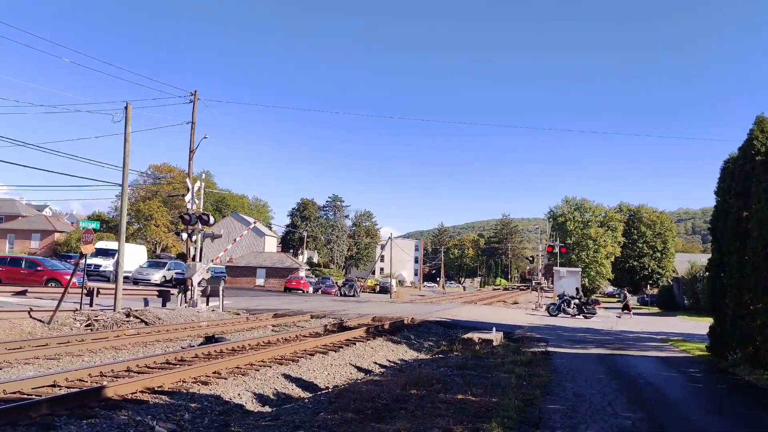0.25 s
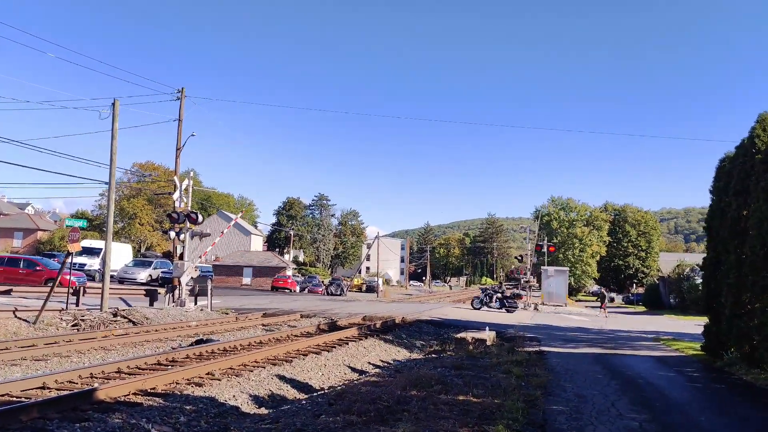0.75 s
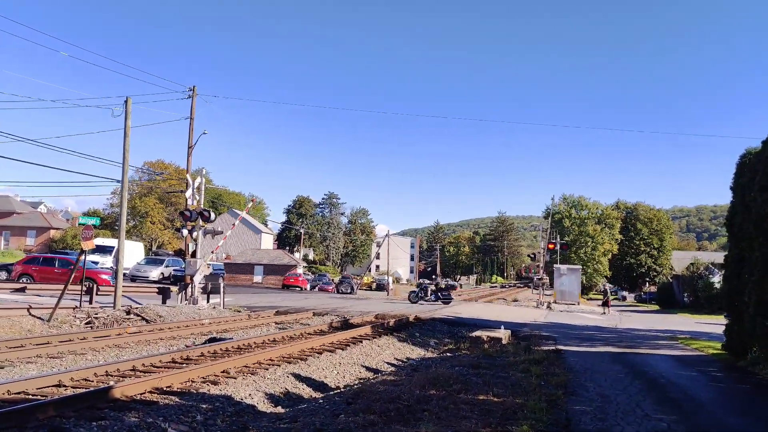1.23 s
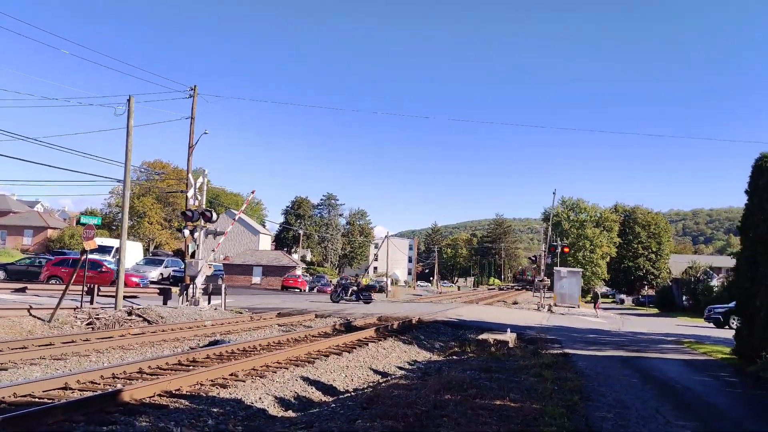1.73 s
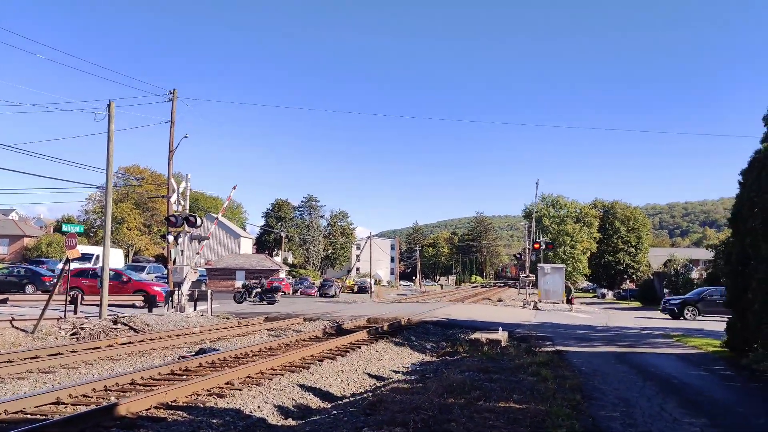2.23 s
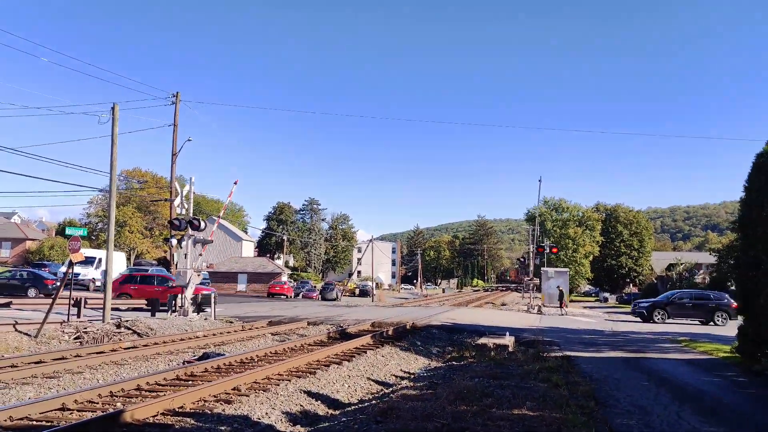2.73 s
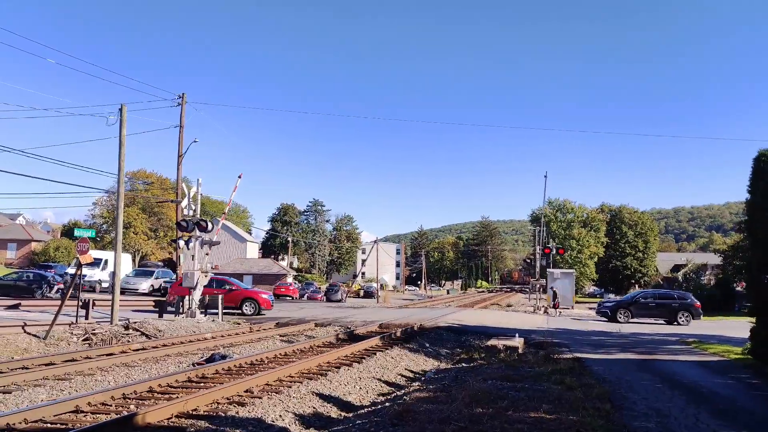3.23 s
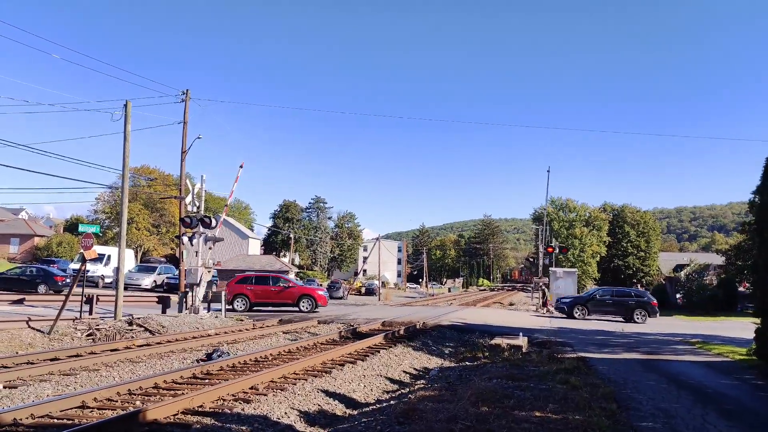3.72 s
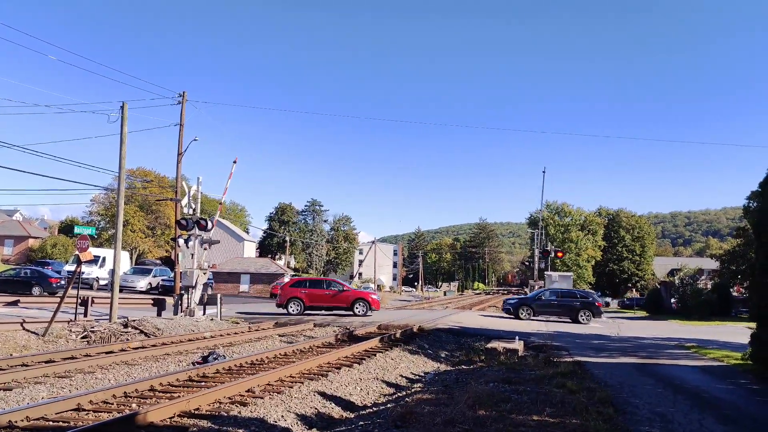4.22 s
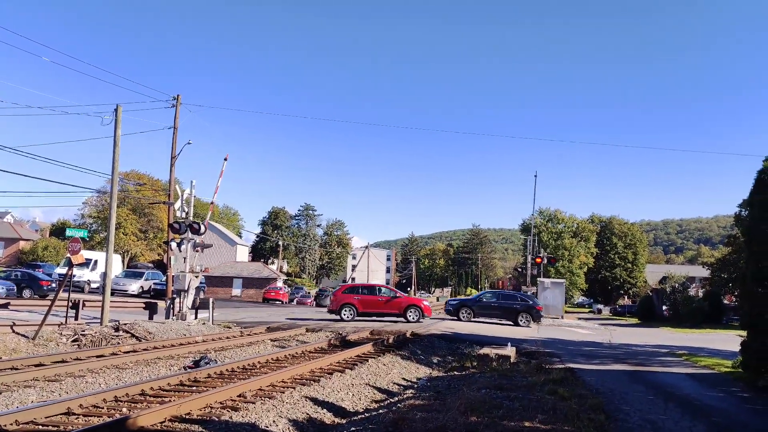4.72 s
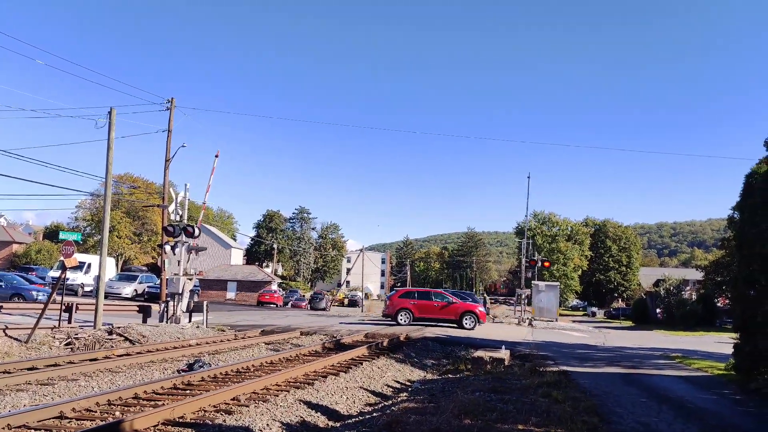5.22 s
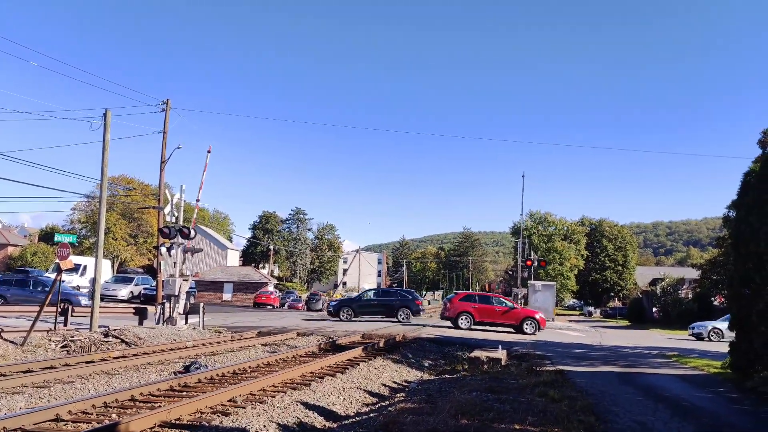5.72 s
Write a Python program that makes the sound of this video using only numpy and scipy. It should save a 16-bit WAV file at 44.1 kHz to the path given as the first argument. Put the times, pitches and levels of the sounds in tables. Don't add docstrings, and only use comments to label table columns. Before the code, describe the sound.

An open roadside by a rail crossing, heard through a handheld stereo microphone with steady, smooth traffic hum behind. In the first half second, rough gusts and dull slaps of air hit mostly the left side. A big two-cylinder motorcycle is already pulling away, its uneven low thumps quickening and growing until about 1.3 s, with rasping barks and bright spitting cracks. It eases off around 1.4-2 s, the engine slowing; one small dry tick snaps near 1.7 s. From 2.1 s it pulls again in short throttle bursts, loudest about 2.4-4.1 s, climbing in pitch with sharp cracks and hollow ringing putts that turn lower and duller. Wind bumps return at 3.5-3.9 s. Traffic swells near 4.1 s, and soft tyre hiss passes around 4.4-5.2 s. After 4.5 s the exhaust slackens and recedes leftward, while heavy wind thuds strike the right around 4.9-5.2 s, then the left to about 5.4 s.

```python
import sys
import numpy as np
from scipy import signal
from scipy.io import wavfile
from scipy.ndimage import uniform_filter1d, minimum_filter1d

SR = 44100
rng = np.random.default_rng(int(sys.argv[2]) if len(sys.argv) > 2 else 0)


def store_wav(level_fs):
    pcm = np.round(np.clip(np.atleast_2d(level_fs), -1, 1) * 32767)
    wavfile.write(sys.argv[1], SR, pcm.T.astype(np.int16))


def how_loud(loudness_db):
    steps = np.asarray(loudness_db, float) / 20
    return 10 ** steps


N = 262836

# pitch_hz, level_db
TRAFFIC_COLOUR = [(150, -13.5), (260, 7), (375, -14.5), (575, -11), (909, -16.5), (1480, -19.5),
                  (2340, -16.5), (3180, -27), (4320, -23.5), (5860, -33), (10000, -53.5), (13000, -80),
                  (22000, -120)]
# time_s, level_db
TRAFFIC_SWELL = [(0, 2.5), (.7, 6), (1.3, 3.5), (1.7, -1), (2.1, 1), (2.9, 3), (3.2, 2.5), (4.1, 7.5),
                 (4.6, 3.5), (5.0, 2), (5.3, -1.5), (5.6, -0.5), (5.96, -1.5)]

# time_s, speed_rpm
ENGINE_SPEED = [(-0.1, 1602), (0.35, 1703), (0.49, 1668), (0.91, 2057), (1.2, 2319), (1.5, 2367),
                (1.51, 2014), (1.8, 1757), (2.26, 1736), (2.67, 1934), (3.23, 2258), (4.25, 2773),
                (4.88, 2808), (4.91, 2593), (5.08, 2482), (5.25, 2678), (5.66, 2477), (6.1, 2395)]
# time_s, level_db
EFFORT = [(0, -24), (.2, -19), (.5, -18), (.85, -12), (1.1, -11), (1.38, -15), (1.76, -26.5), (2.03, -16),
          (2.18, -13), (2.35, -14.5), (2.6, -10), (2.9, -13), (3.4, -9.5), (3.92, -8.5), (4.1, -10),
          (4.45, -13.5), (4.65, -17.5), (5.96, -21.5)]
# time_s, push_width_ms, lean (early +, late -), low_ring_db, upper_ring_db
PIPE_ASPECT = [(0, 1.9, 1, -16, -4), (.3, 1.68, 0.77, -39, -8), (.6, 1.69, 0.93, -25, -8.5),
               (1.0, 1.896, 0.83, -9, -4), (1.4, 1.73, 0.89, -2, -10.5), (1.75, 1.7, 1, -10, -17),
               (2.1, 1.95, 1, -29, -35), (2.45, 1.93, 0.13, -28, -22), (2.75, 2.04, 0.8, -32, -6.5),
               (3.05, 1.96, 1, -6, -9), (3.3, 1.84, 0.67, -11, -24), (3.9, 1.77, -0.58, -5, -28),
               (4.3, 2.07, 0.044, -4.5, -9.5), (4.6, 1.97, -0.34, -0.5, -16.5),
               (4.95, 2.1, 0.55, -24, -9.5), (5.3, 2, 0.68, -30, -11.5), (5.96, 3.1, 0.26, -31, 0)]
# pitch_hz, width_hz
PIPE_RINGS = [(160, 10.3), (295, 52), (372, 79)]
# time_s, delay_ms
WALL_ECHO = [(0, 13.2), (3.5, 14.4), (4, 16.6), (4.8, 19.4), (5.3, 9.5), (5.96, 11.4)]
# time_s, left_bark_lag_ms, left_thump_lag_ms, ground_echo_ms
PASSING = [(0, 0.17, -0.37, 1.614), (1.4, 0.074, -0.012, 1.703), (2.4, -0.08, -0.46, 1.75),
           (3.4, -0.2, -0.15, 1.685), (4.6, -0.38, 0.0011, 1.67), (5.96, -0.51, 0.22, 1.5)]

# open_s, shut_s, rasp_db, brightness_db, mid_ring_db
THROTTLE_PULLS = [(0, .6, -25.5, -1, 0), (.64, 1, -22.5, -1, -1), (1.02, 1.3, -25.5, -1.5, 0.5),
                  (1.33, 1.4, -37, 0, -3), (2.1, 2.21, -27, 0, 0.5), (2.26, 2.37, -29, -1, 1),
                  (2.4, 2.62, -22, 0, -1), (2.66, 2.88, -20.5, 0.5, -2.27), (2.9, 3.18, -29.5, 0.5, -2),
                  (3.22, 3.45, -25, -2, 0), (3.48, 3.8, -24, -2, 1.5), (3.83, 4, -21, -2.5, -0.5),
                  (4.06, 4.36, -34.5, -2.5, 3.5), (4.38, 4.5, -25, -2.5, 1), (4.56, 5, -36, -2, 1)]
# pitch_hz, level_db (per Hz)
RASP_COLOUR = [(260, -42.5), (450, -8), (619, 0.5), (828, 6.5), (1170, 2.5), (1480, 2), (1760, 0.5),
               (2010, 3), (2360, 1), (3390, -9.5), (5980, -11.5), (8350, -36), (10500, 1), (11800, -51),
               (14500, -48)]
# level_db (at a loud pull),
# pull_db_per_db, brightness_db_per_db, mid_ring_db_per_db
RASP_BANDS = [
    (-32, 1.05, -3.5, 0),
    (-26, 1.56, -0.66, 2.5),
    (-30.5, 1.43, 1.25, 2),
    (-53, 2.5, 0, 0.5),
]
ECHO_SHARE = [
    (1.23, 0.36),
    (1.44, 0.69),
    (0.98, 0.96),
    (1.2, 1.6),
]
# time_s, level_db
PIPE_IN_SIGHT = [(0, 7), (.45, 6.5), (.8, 5), (1.25, 3.5), (1.6, -6), (2.15, 0), (2.5, 2), (2.75, -15),
                 (3.1, 4), (3.4, 4), (3.7, 4), (3.95, -7), (4.4, -7), (5, -2), (5.96, 5)]

# start_s, end_s, rumble_db, flutter_db (relative), right_port_db (relative)
GUSTS = [(0, .06, -7.5, 2.5, -4), (.08, .13, -13, 4, 1.5), (.15, .24, -11, 9, -3.5),
         (.25, .385, -16, 12, -8), (.22, .45, -20, -30, 5.5), (.55, .95, -26, -33, 5.5),
         (1.2, 1.42, -22.5, -27, 6), (1.47, 1.5, -16.5, -18, 3.5), (1.97, 2.0, -13, -17, -1.5),
         (2.1, 2.24, -17.5, -29, 3.5), (2.42, 2.5, -22.5, -32, 3), (2.62, 2.75, -29, -22, 1),
         (3.48, 3.62, -14, 4.5, -4), (3.66, 3.86, -18, 1.5, 6.5), (3.89, 3.94, -17, 5.5, 9),
         (4.772, 4.795, -8, -3, -8), (4.82, 5.22, -20, -7.5, 5.5), (5.255, 5.29, -12, -10, -14),
         (5.29, 5.36, -14, 0, -13)]
# rumble_db, flutter_db
WIND_PORTS = [
    (-2, 0),
    (-6, -7),
]
# time_s, peak_db, pitch_hz
LEFT_SLAPS = [(0.008, -17, 720), (0.02, -28, 517), (0.066, -13, 480), (0.1, -16, 650), (0.139, -18, 600),
              (0.304, -13, 650), (0.047, -27, 600), (0.121, -9, 565), (0.164, -19, 480), (0.188, 2, 446),
              (0.189, -17, 945), (0.203, -11, 620), (0.244, -5, 376), (0.249, -8, 900), (0.272, -15, 600),
              (0.33, -19, 500), (.372, 2.5, 324), (1.487, -12, 278), (1.971, -26, 243), (2.221, -13, 258),
              (3.491, -6, 270), (3.553, -11, 300), (3.594, -9, 378), (3.925, -16, 336), (4.777, -0.5, 301),
              (5.057, -20, 233), (5.241, -7, 135), (5.26, -4, 167), (5.271, -16.5, 560), (5.285, -10, 260),
              (5.314, -16, 600), (5.322, -15, 250), (5.347, -10.5, 300)]
# time_s, peak_db, pitch_hz
RIGHT_SLAPS = [
    (4.869, 1, 106),
    (4.973, -22, 154),
    (5.145, -9.5, 153),
    (5.219, 3, 115),
]

# time_s, peak_db, centre_hz, top_db (relative)
BRIGHT_CRACKS = [(0.0817, -17, 4400, -32.5), (0.1284, -21, 4100, -27.5), (0.157, -21, 4360, -27.5),
                 (0.2728, -20, 4430, -13), (0.3416, -23, 4370, -24.5), (0.4145, -28, 4630, -27),
                 (0.4866, -39.5, 5430, -15.5), (0.623, -23, 5030, -22.5), (0.6515, -25, 5790, -16.5),
                 (0.688, -26.5, 6120, -18), (0.7557, -17.5, 5900, -9), (0.7777, -23, 5010, -23.5),
                 (0.874, -16.5, 5600, -23.5), (0.8999, -21.5, 5700, -20.5), (0.9345, -23, 6100, -13),
                 (2.1067, -23, 5680, -17), (2.136, -22.5, 4140, -24), (2.1767, -18.5, 5770, -16),
                 (2.279, -22.5, 5900, -28), (2.4154, -24, 5400, -22), (2.4503, -13.5, 6140, -14),
                 (2.4758, -17, 4430, -21), (2.578, -33, 4300, -20), (2.7048, -26, 4180, -23.5),
                 (2.7307, -22, 4660, -20.5), (2.764, -14, 6050, -23), (2.824, -15, 3760, -18),
                 (2.8803, -12, 4420, -18), (3.269, -18, 4080, -19), (3.3227, -18, 4180, -26.5),
                 (3.3717, -17.5, 4200, -22), (3.4251, -20, 4230, -14), (3.476, -15, 4100, -23.5),
                 (3.4957, -16, 4340, -30), (3.5274, -19, 3780, -23), (3.576, -19, 4100, -29),
                 (3.6883, -18.5, 4640, -22), (3.7697, -17, 3660, -26), (3.836, -25, 3900, -23),
                 (3.9554, -16, 4200, -24.5), (4.4373, -37, 3660, -20.5)]
# time_s, peak_db, centre_hz, top_db (relative)
DULL_CRACKS = [(0.3052, -12, 1040, -45), (1.0484, -19, 1230, -44.5), (1.0992, -14, 1200, -45),
               (1.1523, -20.5, 1810, -45), (2.5152, -16, 1740, -40), (2.5426, -15.5, 2290, -45),
               (2.6688, -18, 2300, -45), (2.7895, -13.5, 1180, -45), (3.694, -17, 2060, -48),
               (3.7887, -8, 1000, -45), (3.9084, -27, 2580, -47), (4.046, -21, 2430, -43),
               (4.1335, -19, 1010, -45), (4.1969, -17.5, 2860, -47), (4.368, -20, 2990, -47),
               (4.394, -17, 2410, -45), (4.4122, -14.5, 2420, -47), (4.4556, -21, 2970, -45),
               (4.4808, -26, 2150, -45), (4.5024, -23, 2520, -43)]
# time_s, peak_db, centre_hz
MID_PUTTS = [(0.415, -26, 1200), (0.486, -16, 1050), (0.558, -12, 1170), (0.587, -9, 1830),
             (0.625, -15, 2410), (0.689, -14, 937), (0.719, -19, 1260), (0.753, -20, 1560),
             (0.814, -15, 1200), (0.841, -18, 1200), (0.875, -16, 1180), (0.898, -20, 1810),
             (0.931, -20, 1590), (0.957, -25, 1220), (0.989, -24, 1140), (1.014, -19, 1180),
             (1.071, -26, 1160), (1.177, -21, 1010), (1.204, -22, 1150), (1.228, -21, 891),
             (1.258, -14, 1180), (1.277, -19, 1140), (2.414, -15, 1160), (2.447, -13.5, 1730),
             (2.477, -15.5, 1030), (2.576, -10, 1630), (2.604, -25, 1180), (2.641, -18, 1180),
             (2.706, -19, 1150), (2.732, -17, 1670), (2.764, -11, 1290), (2.823, -7, 1240),
             (2.848, -24, 1600), (2.882, -23, 950)]
# time_s, peak_db, centre_hz
LOW_PUTTS = [(3.444, -23, 552), (3.475, -29, 624), (3.526, -34, 630), (3.572, -30, 654), (3.596, -13, 880),
             (3.644, -12, 930), (3.672, -19, 727), (3.694, -15, 794), (3.721, -17, 840), (3.742, -26, 646),
             (3.768, -13, 560), (3.789, -9, 627), (3.815, -15, 714), (3.836, -9, 930), (3.863, -18, 692),
             (3.884, -12, 581), (3.908, -16, 651), (3.929, -16, 614), (3.954, -13, 638), (3.982, -22, 620),
             (3.999, -13, 649), (4.042, -21, 560), (4.089, -24, 853), (4.107, -21, 608), (4.133, -20, 646)]

# time_s, peak_db
TICKS = [
    (1.67, -48),
    (1.6697, -26.5),
]
# time_s, half_length_s, level_db
SWISHES = [
    (4.406, 0.073, -41),
    (4.75, 0.52, -47),
]


def rms_one(x):
    return x / np.sqrt(np.mean(x ** 2) + 1e-20)


def in_time(rows):
    s, *columns = np.transpose(rows)
    return [np.interp(np.arange(N) / SR, s, c) for c in columns]


def band(x, low_hz, high_hz, order=2):
    limits = [low_hz, min(high_hz, .45 * SR)]
    return signal.sosfilt(signal.butter(order, limits, "band", fs=SR, output="sos"), x)


def resonance(x, hz, width_hz):
    r = np.exp(-np.pi * width_hz / SR)
    feedback = [1, -2 * r * np.cos(2 * np.pi * hz / SR), r * r]
    return signal.lfilter([(1 - r * r) / 2, 0, (r * r - 1) / 2], feedback, x)


def decay(x, seconds):
    r = np.exp(-1 / (seconds * SR))
    return signal.lfilter([1 - r], [1, -r], x)


def drift(rate_hz):
    seconds = 1 / (2 * np.pi * rate_hz)
    slow = decay(decay(rng.standard_normal(N + SR), seconds), seconds)
    return rms_one(slow[SR:])


def late(x, ms):
    return np.interp(np.arange(N) - ms * SR / 1000, np.arange(N), x)


def evened(x, seconds=0.2):
    return x / np.sqrt(uniform_filter1d(x ** 2, int(seconds * SR)) + 1e-12)


def coloured(white, spectrum):
    hz, level_db = np.transpose(spectrum)
    edges = hz[0] * 2 ** np.arange(0, np.log2(hz[-1] / hz[0]), 1 / 3)
    mids = np.sqrt(edges[1:] * edges[:-1])
    gains = how_loud(np.interp(np.log(mids), np.log(hz), level_db))
    rows = []
    for k, (gain, low, high) in enumerate(zip(gains, edges, edges[1:])):
        rows.append(gain * band(white[k % 2], low, high))
    return np.array(rows), mids


def bursts(rows, rise, fall, rest):
    hop = 64
    t, rows = np.arange(0, N, hop) / SR, np.array(rows)
    levels = []
    for start, end, db in rows[:, :3]:
        levels.append(db - rise * np.maximum(start - t, 0) - fall * np.maximum(t - end, 0))
    levels.append((rest[0] + np.zeros(N))[::hop])
    levels = np.array(levels)
    columns = np.vstack([rows[:, 3:], rest[1:]])[levels.argmax(axis=0)].T
    smooth = uniform_filter1d(np.vstack([levels.max(axis=0), columns]), size=7)
    return in_time(np.vstack([t, smooth]).T)


def traffic():
    mid, hz = coloured(rng.standard_normal((2, N)), TRAFFIC_COLOUR[1:-2])
    side, _ = coloured(rng.standard_normal((2, N)), TRAFFIC_COLOUR[1:-2])
    alike = np.clip(.9 - 0.42 * np.log2(hz / 300), 0, .95)[:, None]
    mid = (np.sqrt(1 + alike) * mid).sum(0)
    side = (np.sqrt(1 - alike) * side).sum(0)
    hum = band(np.array([mid + side, mid - side]), 330, 7600, order=4)
    level_db = -36.5 + in_time(TRAFFIC_SWELL)[0] + 1.9 * drift(2.5)
    return how_loud(level_db) * rms_one(hum)


def air():
    return how_loud(-88.5 + 2.5 * drift(9)) * rms_one(band(rng.standard_normal((2, N)), 9000, 14200))


def crank():
    first_cycle, step_s = -.1362, .0005
    s, rpm = np.transpose(ENGINE_SPEED)
    t = np.arange(s[0], s[-1], step_s)
    return t, first_cycle + np.cumsum(np.interp(t, s, rpm)) * step_s / 120


def firings(lead_s, weak_db, uneven_db, chance):
    second_cylinder = .433
    s, cycles = crank()
    turn = np.arange(len(chance))
    when = np.interp(np.stack([turn, turn + second_cylinder], axis=1), cycles, s) - lead_s
    when = when + 0.00025 * chance[..., 0]
    size = how_loud(uneven_db * chance[..., 1] + [0, weak_db])
    inside = (when > 0) & (when < (N - 1) / SR)
    clicks = np.full(N, 1e-18)
    clicks[(when[inside] * SR).astype(int)] = size[inside]
    return clicks


def thump(chance):
    (level_db,) = in_time(EFFORT)
    width_ms, lean, low_ring_db, upper_ring_db = in_time(PIPE_ASPECT)
    clicks = firings(0.00017, -1.0, .5, chance)
    half = SR // 80
    body, t_ms = np.zeros(N + 2 * half), np.arange(-half, half) * 1000 / SR
    for i in np.flatnonzero(np.abs(clicks) > 1e-9):
        u = t_ms / np.clip(width_ms[i], 1.2, 4)
        body[i:i + 2 * half] += clicks[i] * (u ** 2 - 1 - (lean[i] + 0.72) * u) * np.exp(-u ** 2 / 2)
    body = body[half:half + N]
    rings = how_loud(0.25) * resonance(body, 92.5, 14)
    ring_levels_db = (low_ring_db + 8, upper_ring_db + 16, upper_ring_db + 21)
    for ring_db, (hz, width_hz) in zip(ring_levels_db, PIPE_RINGS):
        rings = rings + how_loud(ring_db) * resonance(body, hz, width_hz)
    echo = 0.49 * late(body, in_time(WALL_ECHO)[0])
    return how_loud(level_db) * evened(band(body + echo + rings, 48, 2000, order=1))


def rasp_levels():
    coast_db = -32 - 11 * np.maximum(np.arange(N) / SR - 3.8, 0)
    pull_db, bright_db, ring_db = bursts(THROTTLE_PULLS, 398, 148, (coast_db, 0, 0))
    above_db = pull_db + 25
    band_db = []
    for db, follow, tilt, mid in RASP_BANDS:
        band_db.append(db + follow * above_db + tilt * bright_db + mid * ring_db)
    band_db[3] = band_db[3] + in_time(PIPE_IN_SIGHT)[0]
    smear_db = 0.5 - 1.16 * above_db
    return np.array(band_db), smear_db


def bark(chance):
    band_db, smear_db = rasp_levels()
    clicks = firings(.0046, -1.0, 1.76, chance)
    gate = evened(decay(decay(clicks, 0.0047), 0.00096))
    shock = 0.89 * evened(decay(clicks, .00006))
    burst = rng.standard_normal((2, N)) * gate + 0.24 * shock
    echo_ms = in_time(PASSING)[2]
    burst = burst + 0.6 * np.array([late(b, echo_ms) for b in burst])
    shared, own = rng.standard_normal((2, N)), rng.standard_normal((2, 2, N))
    smear = how_loud(smear_db + 2.2 * drift(31))
    out = []
    for noise in (burst, 0.5 * smear * shared, *(0.75 * smear * own)):
        rows, mids = coloured(noise, RASP_COLOUR)
        group = np.digitize(mids, [1450, 3400, 7500])
        out.append([rows[group == k].sum(0) for k in range(4)])
    direct, together, left, right = np.array(out)
    alike, differing = np.transpose(ECHO_SHARE)[..., None]
    out = np.array([direct + alike * together, differing * left, differing * right])
    level = np.sqrt(uniform_filter1d(out[0] ** 2 + out[1] ** 2, SR // 4))
    return (out / level * how_loud(band_db)).sum(1)


def wind():
    rumble_db, flutter_db, right_db = bursts(GUSTS, 504, 401, (-27, -19, 0))
    lumpy_db = 2.5
    alike = 0.53
    out, common = [], rng.standard_normal(N)
    for side_db, top_db in WIND_PORTS:
        white = rng.standard_normal((2, N))
        rumble = rms_one(band(white[0] + alike / (1.05 - alike) * common, 27.9, 155.3, order=3))
        rumble = rumble * how_loud(lumpy_db * drift(14.0))
        flutter = rms_one(decay(band(white[1], 110, 530), 0.003))
        flutter = flutter * how_loud(flutter_db + top_db - 11.0 + 2.26 * lumpy_db * drift(28))
        out.append(how_loud(rumble_db + side_db + 5.0) * (rumble + flutter))
    out[1] = out[1] * how_loud(right_db)
    add_slaps(out[0], LEFT_SLAPS)
    add_slaps(out[1], RIGHT_SLAPS)
    return np.array(out)


def add_slaps(port, rows):
    t = np.arange(SR // 20) / SR
    swell = t / .004 * np.exp(-t / .004)
    for s, peak_db, hz in rows:
        push = 8.1 * t * hz * np.exp(-4.0 * t * hz)
        puff = rng.standard_normal(len(t)) * swell + push
        puff = resonance(resonance(puff, hz, hz), hz, hz)
        start = round(s * SR)
        port[start:start + len(t)] += how_loud(peak_db) * puff / np.abs(puff).max()


def cracks(rows):
    out, t = np.zeros(N + SR), np.arange(SR // 40) / SR
    shape = np.exp(-t / 0.003) * (1 - np.exp(-t / 0.00053))
    for s, peak_db, hz, top_db in rows:
        hiss = rng.standard_normal(len(t)) * shape
        core = resonance(resonance(hiss, hz, 970), hz, 970)
        body = resonance(hiss, 1480, 730)
        top = band(hiss, 7500, 22000)
        spit = core / np.abs(core).max()
        spit = spit + how_loud(-10) * body / np.abs(body).max()
        spit = spit + how_loud(top_db - 3) * top / np.abs(top).max()
        start = round(s * SR)
        out[start:start + len(t)] += how_loud(peak_db - 1) * spit
    return out[:N]


def putts(rows, width_hz, tail_s, lift_db):
    out, t = np.zeros(N + SR), np.arange(SR // 25) / SR
    push = 12 * (t == 0)
    for s, peak_db, hz in rows:
        hiss = rng.standard_normal(len(t)) * np.exp(-t / tail_s)
        ring = band(resonance(hiss + push, hz, width_hz), hz / 2, hz * 2, order=1)
        start = round(s * SR)
        out[start:start + len(t)] += how_loud(peak_db + lift_db) * ring / np.abs(ring).max()
    return out[:N]


def tick():
    clicks = np.full(N, 1e-18)
    for s, peak_db in TICKS:
        clicks[round(s * SR)] = how_loud(peak_db + 49.5)
    noise = rng.standard_normal((2, N))
    snap = decay(clicks, 0.0028) * (noise[0] + .6 * noise)
    return band(decay(snap, .00007), 2800, 14000)


def swishes():
    t = np.arange(N) / SR
    centre_hz, width_hz = 2420, 860
    hiss = resonance(rng.standard_normal(N), centre_hz, width_hz)
    hiss = rms_one(resonance(hiss, centre_hz, width_hz))
    hiss = hiss * sum(how_loud(db) * np.exp(-((t - s) / half) ** 2) for s, half, db in SWISHES)
    return np.array([hiss, late(hiss, 0.31)])


def scene():
    bark_ms, thump_ms, _ = in_time(PASSING)
    around = traffic() + air()
    chance = rng.standard_normal((int(crank()[1][-1]), 2, 2))
    low = thump(chance)
    direct, smear_left, smear_right = bark(chance)
    around = around + wind()
    direct = direct + how_loud(4.5) * cracks(BRIGHT_CRACKS)
    dull = how_loud(-2.5) * cracks(DULL_CRACKS)
    dull = dull + putts(MID_PUTTS, 330, 0.005, -4) + putts(LOW_PUTTS, 200, .006, -1.3)
    around = around + tick() + swishes()
    left = late(low, .5 + thump_ms) + how_loud(-5.5) * (late(direct, .5 + bark_ms) + smear_left)
    right = late(low, 0.58) + how_loud(-4.0) * (late(direct, 0.47) + smear_right)
    left = left + late(dull, .5 + bark_ms)
    right = right + late(dull, .5)
    return np.array([left, right]) + around


def band_limit(x):
    return signal.sosfilt(signal.butter(12, 14690, fs=SR, output="sos"), x)


def record(dry):
    x = dry - 0.12 * resonance(dry, 3500, 730)
    allowed = np.minimum(1, how_loud(-.3) / (np.abs(x) + 1e-9))
    gain = minimum_filter1d(allowed, size=SR // 100)
    gain = uniform_filter1d(gain, size=SR // 100)
    x = signal.sosfilt(signal.cheby2(10, 60, 15400, fs=SR, output="sos"), x * gain)
    return band_limit(x)


dry = scene()
out = record(dry)
store_wav(out)
```